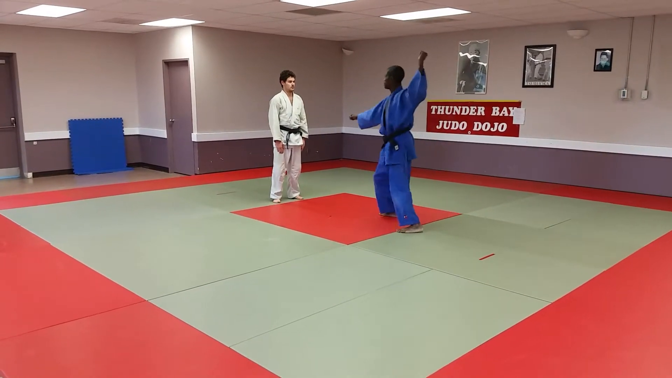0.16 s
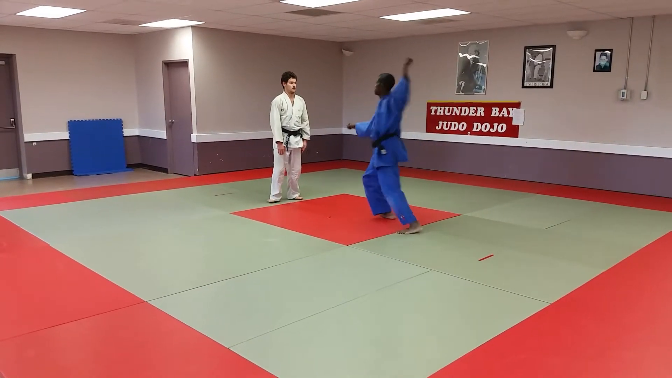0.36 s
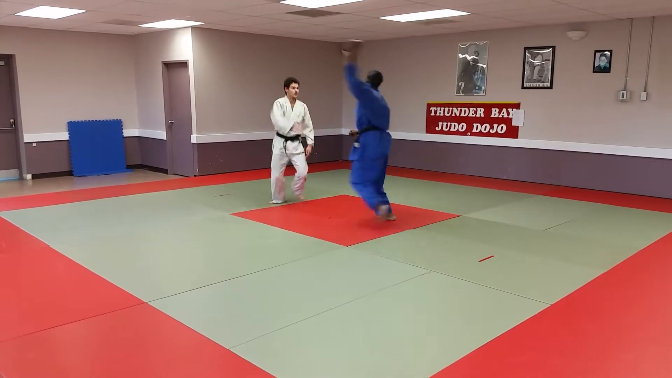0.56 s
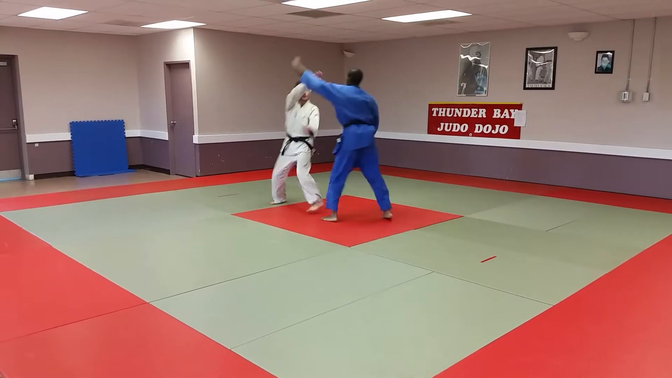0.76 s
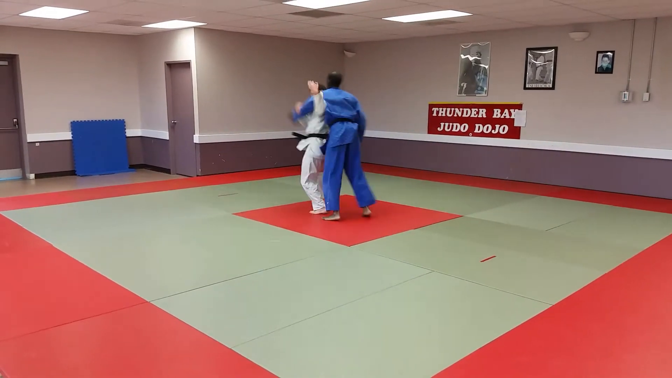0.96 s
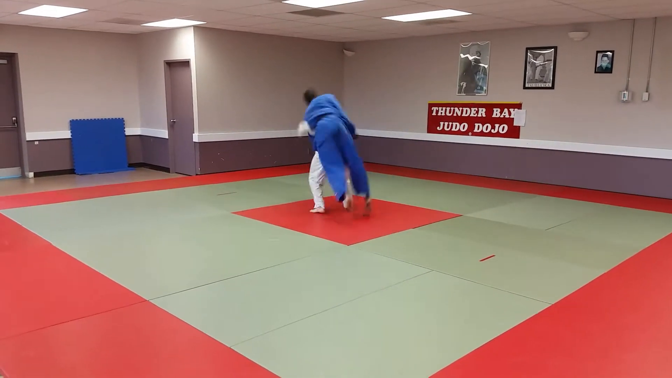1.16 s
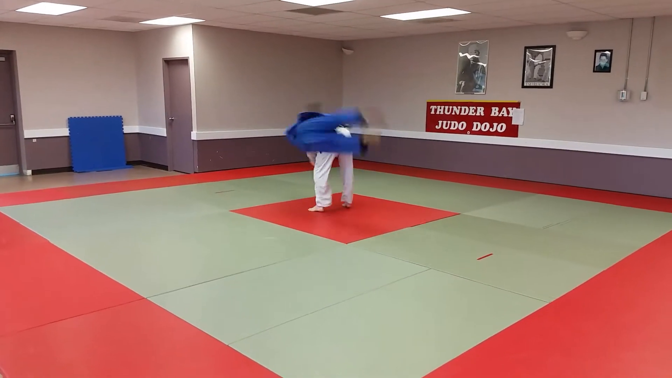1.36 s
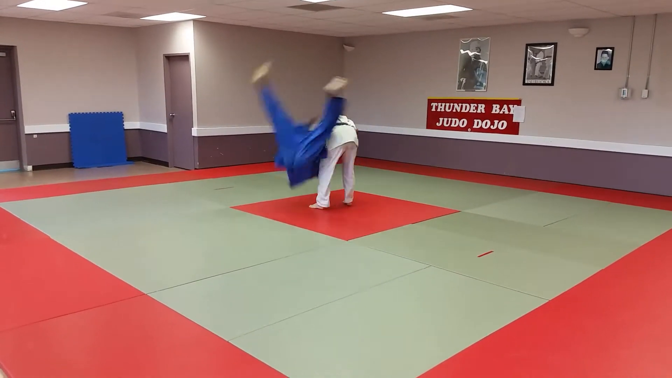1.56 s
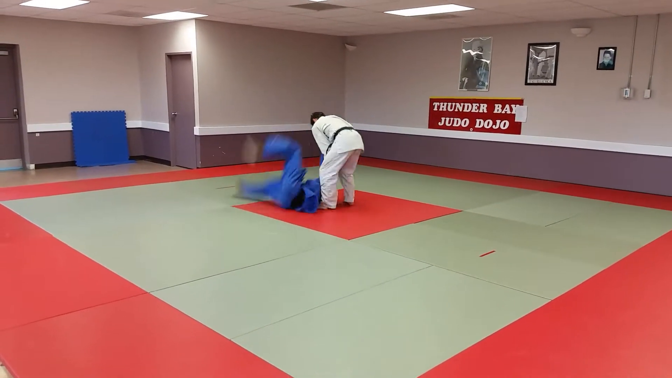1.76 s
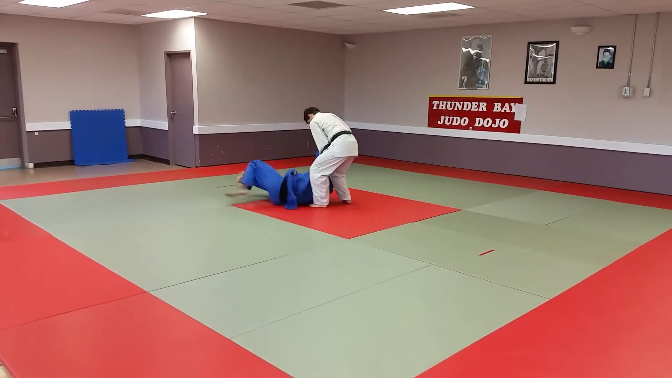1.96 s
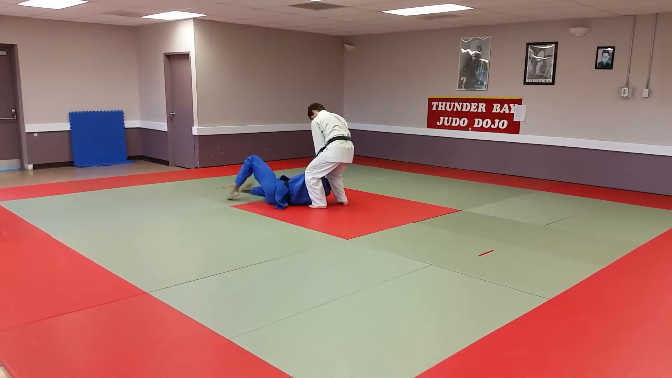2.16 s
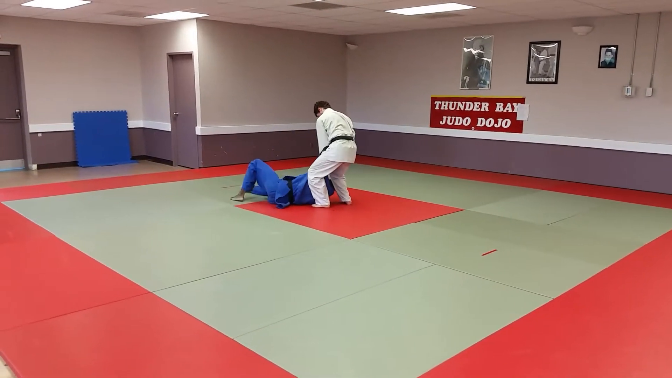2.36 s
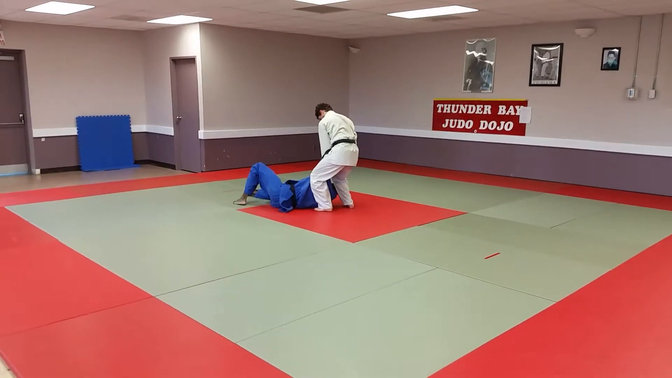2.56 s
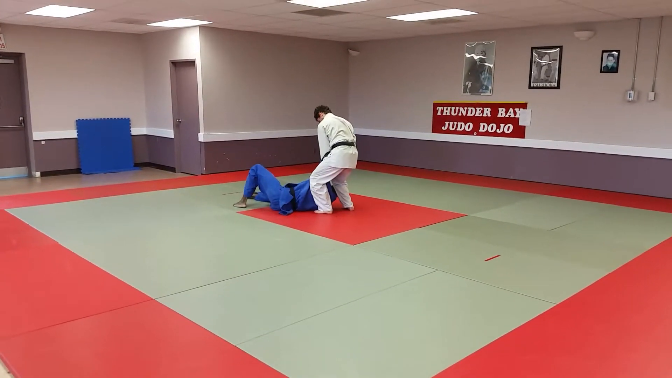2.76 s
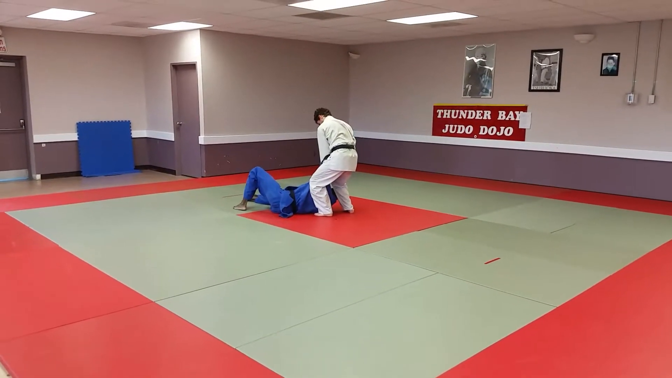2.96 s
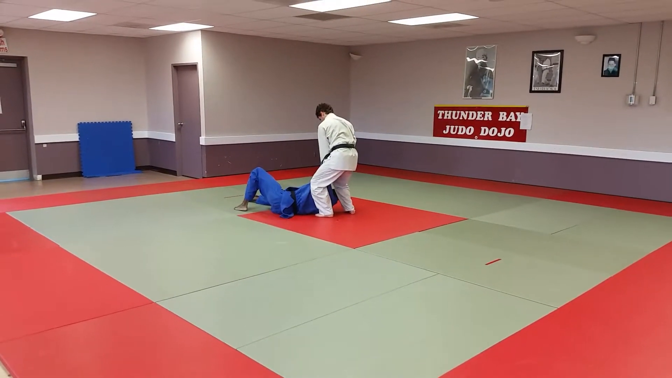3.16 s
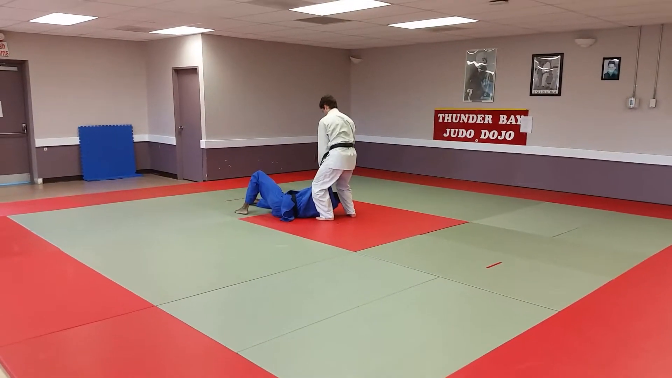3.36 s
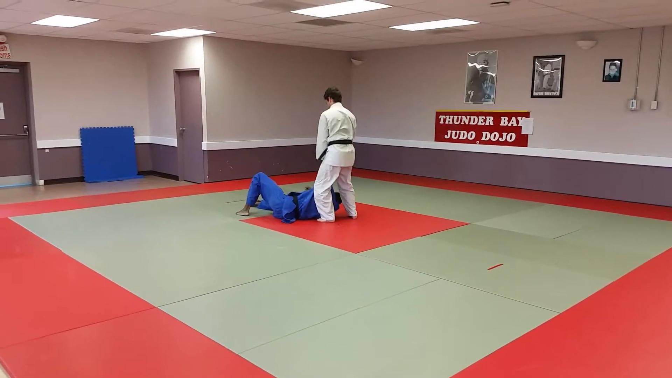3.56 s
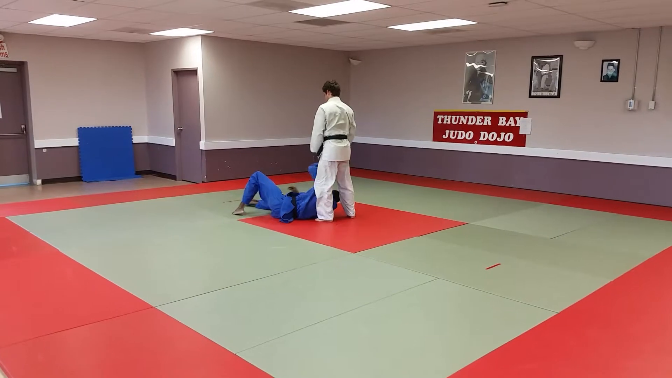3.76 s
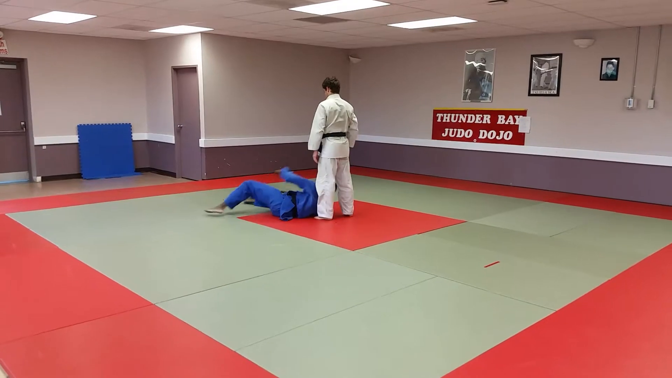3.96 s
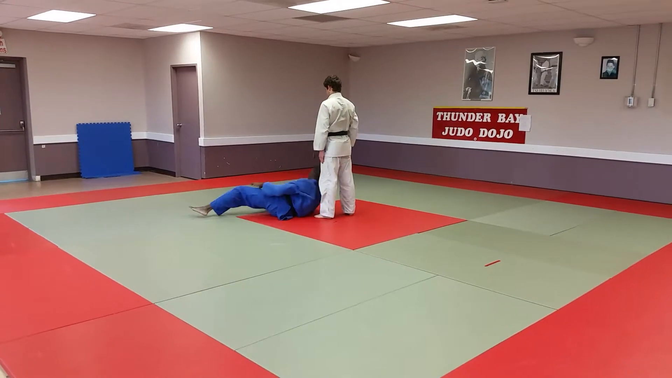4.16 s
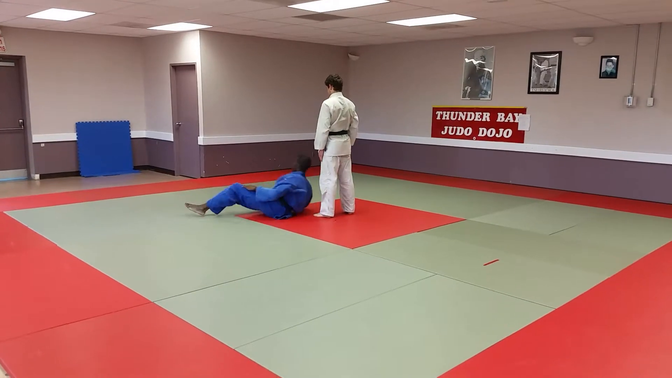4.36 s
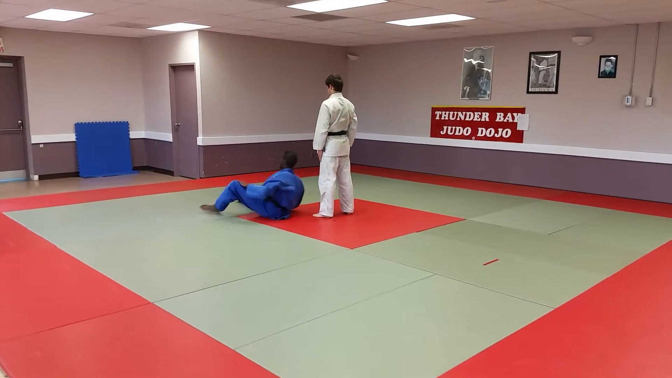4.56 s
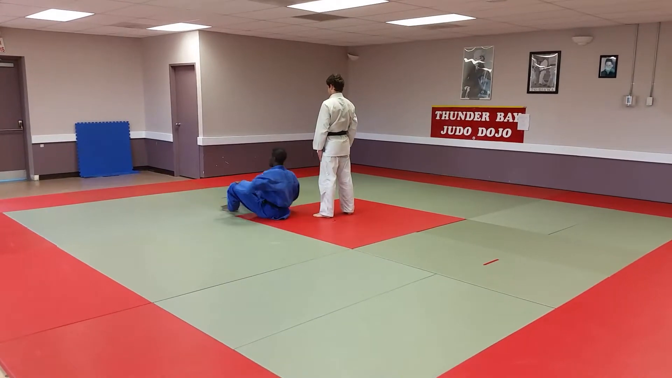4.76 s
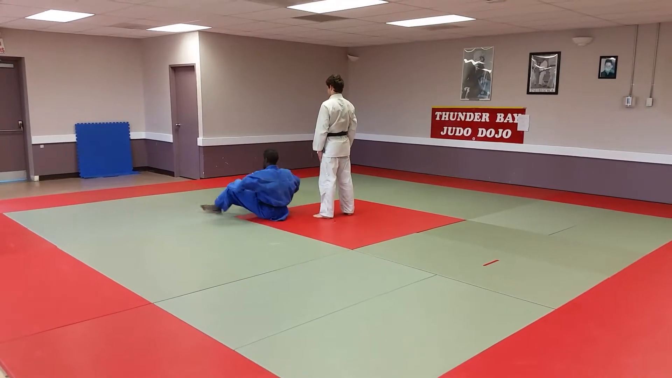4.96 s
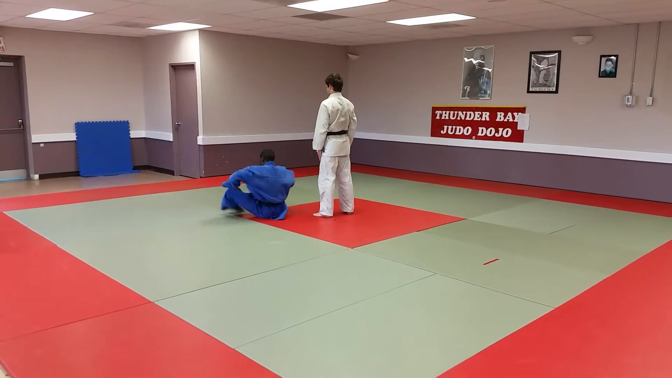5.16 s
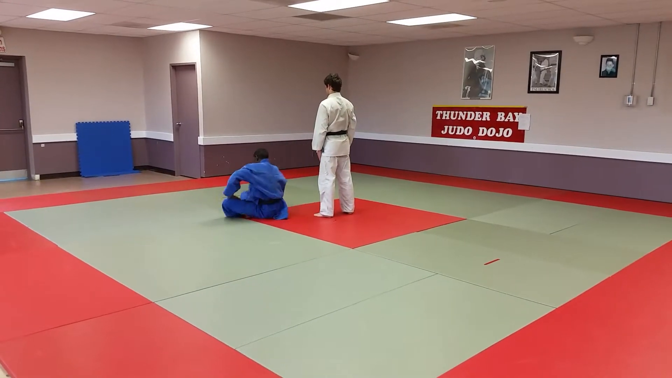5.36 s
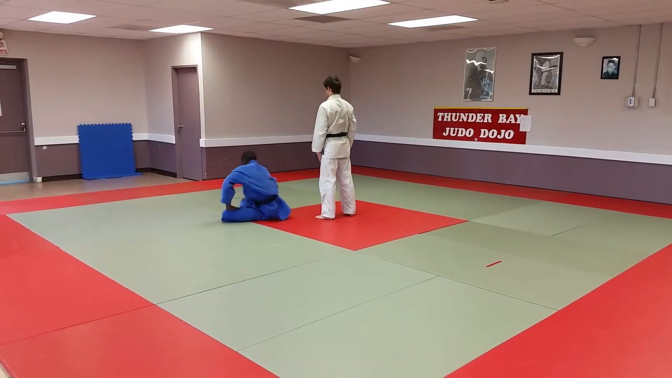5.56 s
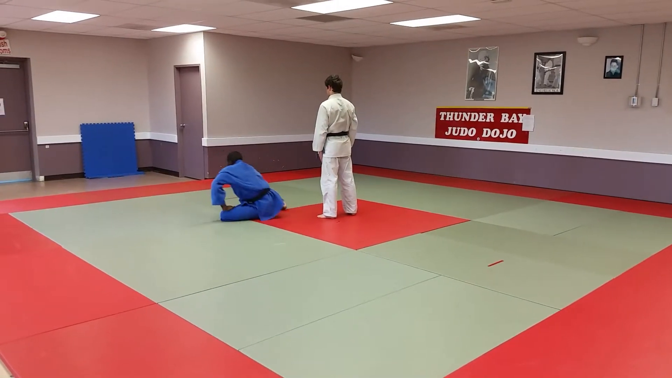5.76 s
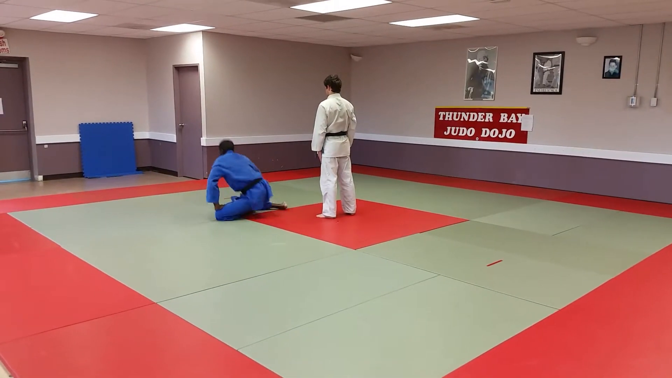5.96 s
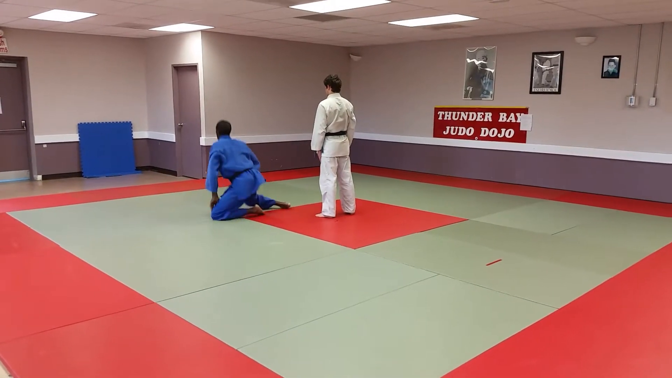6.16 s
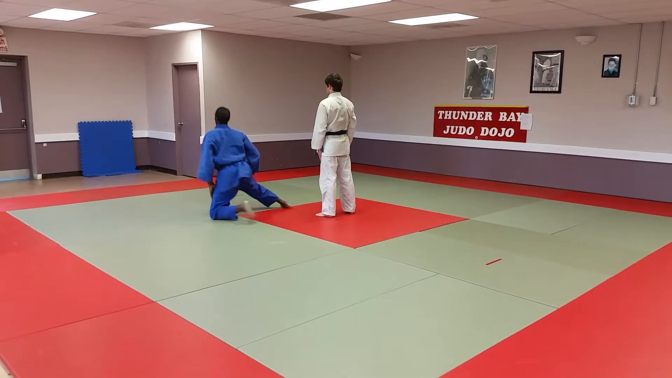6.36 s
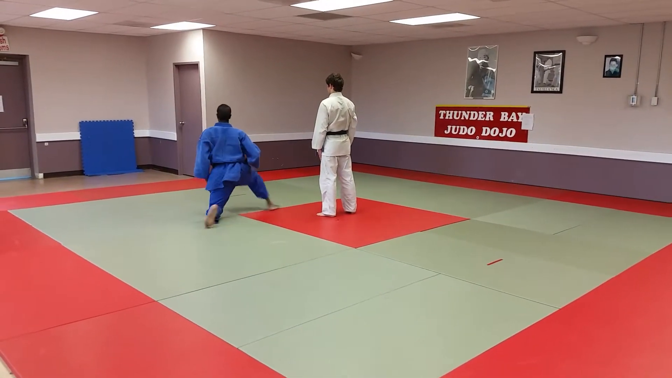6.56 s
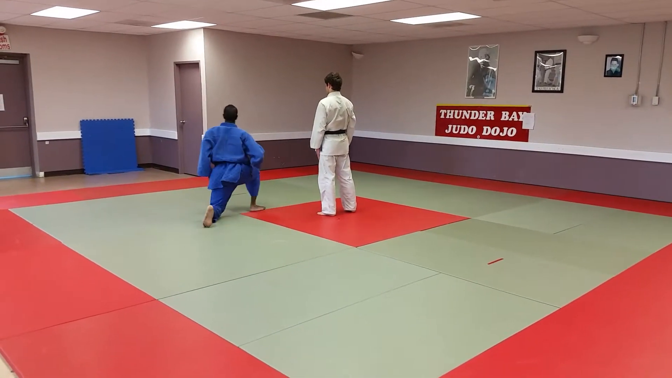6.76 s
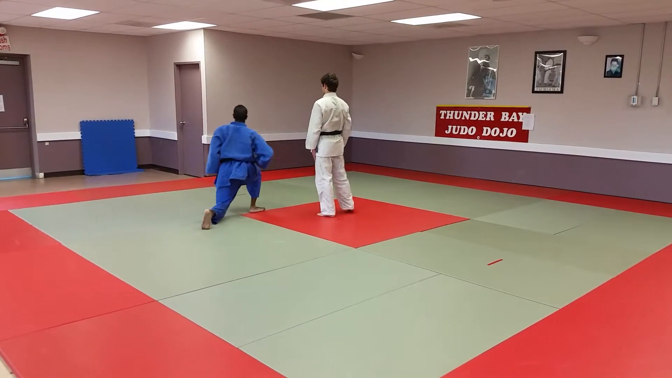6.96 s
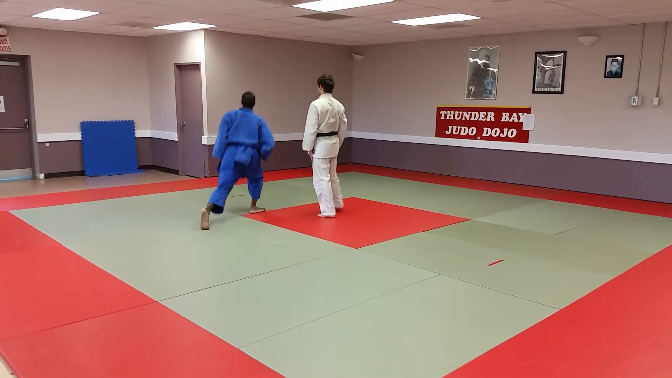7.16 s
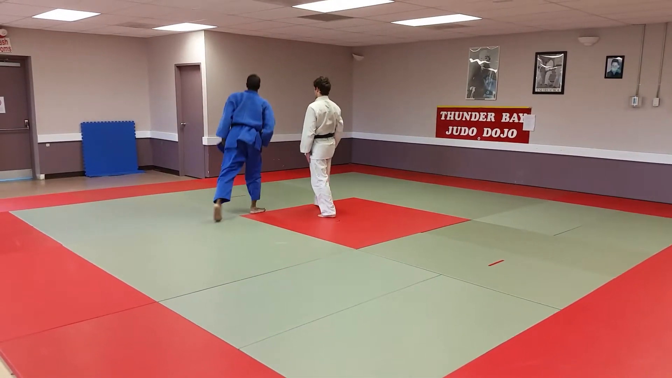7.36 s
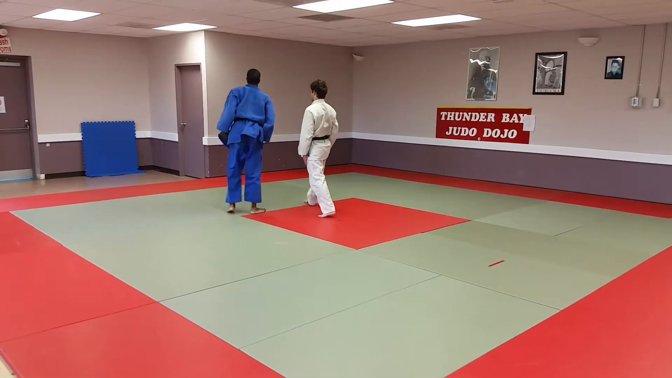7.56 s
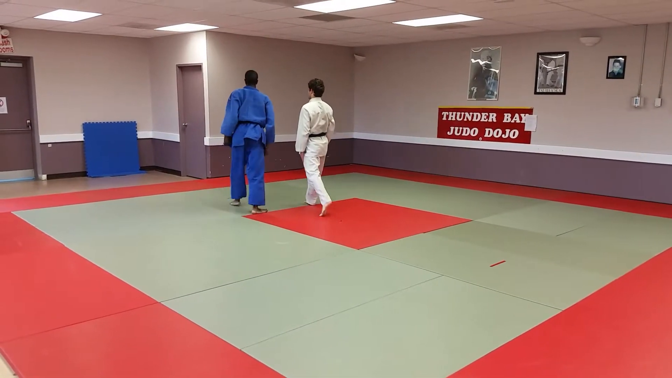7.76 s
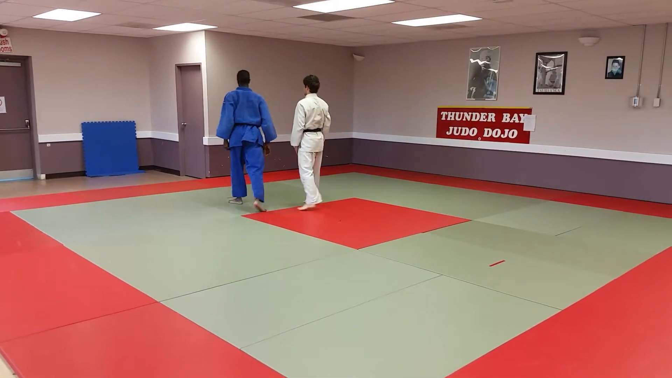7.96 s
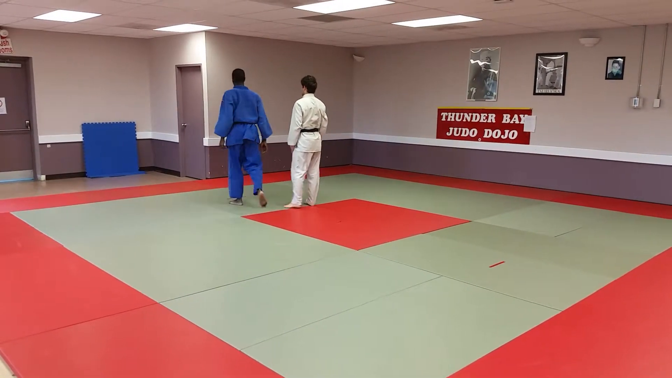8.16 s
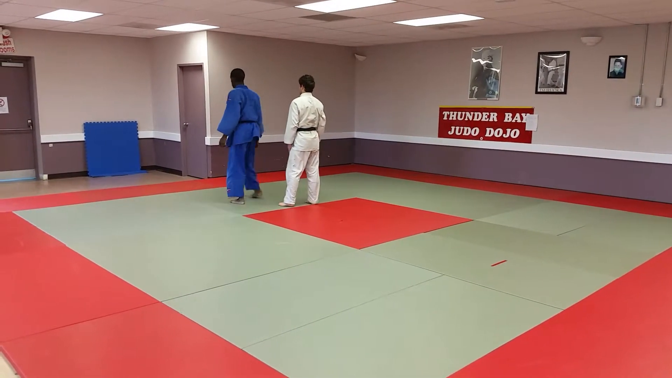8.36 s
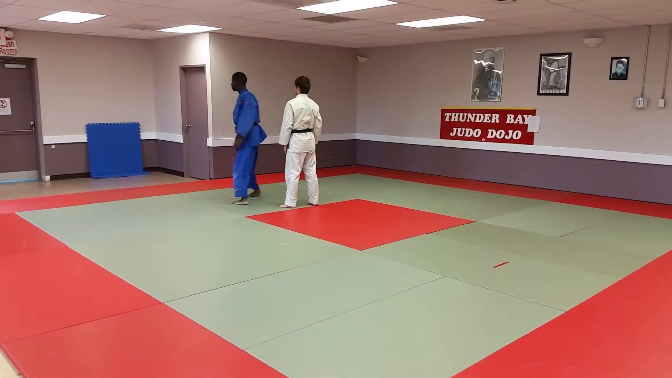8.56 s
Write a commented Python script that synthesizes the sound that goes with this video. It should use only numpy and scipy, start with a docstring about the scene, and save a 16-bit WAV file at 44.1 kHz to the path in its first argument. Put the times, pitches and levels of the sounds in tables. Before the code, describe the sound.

In a humming indoor hall, quick footfalls and jacket tugs lead to a heavy body slam on mats, then faint sliding and a short foot scrape.

```python
"""A judo throw in a low hall: bare feet scuff and stamp on mats, then a body lands with thud and slap.
The thrown partner rolls over, gets up and both shuffle away; ventilation hums throughout.
Impacts are decaying noise bursts with a reverberant tail, and the landing also excites floor modes.
Cloth, knees and soles are friction noise under movement envelopes; a pivoting sole scrapes by stick-slip.
The camera's gain control ducks after the landing, the treble more deeply, and creeps back."""
import sys
import numpy as np
from scipy import signal
from scipy.fft import rfft, irfft, next_fast_len
from scipy.io import wavfile
from scipy.ndimage import uniform_filter1d, minimum_filter1d, map_coordinates

SR = 44100
rng = np.random.default_rng(int(sys.argv[2]) if len(sys.argv) > 2 else 0)


def put_to_file(sound):
    """Save the sound as 16-bit audio at rate SR, in the file named by the first command-line argument."""
    columns = np.atleast_2d(sound).T  # one column per channel
    safe = np.clip(columns, -1, 1)
    whole_steps = np.round(safe * 32767)
    wavfile.write(sys.argv[1], SR, whole_steps.astype(np.int16))


N = 380485
TIME = np.arange(N) / SR  # s

# relative spectrum of the foam's dull thud: freq_hz, density_db (per Hz)
THUD_SPECTRUM = [(20, -28.5), (45, -10), (75, -1), (130, -8.5), (250, -6.5), (340, -13.5), (450, -23),
                 (700, -26), (1500, -66.5)]
# relative spectrum of the knock on the mat cover: freq_hz, density_db (per Hz)
KNOCK_SPECTRUM = [(150, -22.5), (350, 1), (600, 8), (800, 2.5), (1050, 1), (1300, -1.5), (2000, -5),
                  (2700, -23), (5500, -24), (12000, -43.5)]

SAG_DB_PER_S = 5.5  # a stroke loses speed while it lasts
DRAG_T60_S, RASP_T60_S, HISS_T60_S = 0.74, 0.81, 0.54  # each part of a stroke dies away in the hall
STOP_DB, STOP_S = 1, 0.041  # the direct sound goes first when a stroke stops


def amp(db):
    """Logarithmic level: decibels to amplitude gain."""
    return 10 ** (np.asarray(db) / 20)


def unit(x):
    """Normalisation: x scaled to rms 1."""
    return x / np.sqrt(np.mean(x ** 2) + 1e-20)


def along(points, hz):
    """Logarithmic interpolation: (frequency, value) points read on a log frequency axis."""
    point_hz, value = np.transpose(points)
    return np.interp(np.log(hz + 1), np.log(point_hz + 1), value)


def wobble(rate_hz):
    """Slow random modulation: a smooth curve through rate_hz random knots a second."""
    knots = rng.standard_normal(int(N * rate_hz / SR) + 4)
    return map_coordinates(knots, [TIME * rate_hz])


def filtered(x, response):
    """Linear filtering: the spectrum of x times a response of frequency."""
    n = x.shape[-1]
    padded = next_fast_len(n + SR // 8)
    hz = np.fft.rfftfreq(padded, 1 / SR)
    return irfft(rfft(x, padded) * response(hz), padded)[..., :n]


def diffuse(pair, spectrum):
    """Diffuse field: two coloured noises of joint rms 1, alike in the bass, unrelated in the treble."""
    # left-right likeness of the field: freq_hz, coherence (0 to 1)
    likeness = [(60, 0.98), (130, 0.97), (290, 0.89), (640, 0.49), (1400, 0.085), (3000, 0.023), (15000, 0)]

    def mid_side_response(hz):
        angle = np.arccos(np.clip(along(likeness, hz), -1, 1)) / 2
        return amp(along(spectrum, hz)) * [np.cos(angle), np.sin(angle)]

    mid, side = filtered(pair, mid_side_response)
    return unit(np.array([mid + side, mid - side]))


def add(track, start_s, sound):
    """Superposition: mix a sound into the track from start_s."""
    part = track[:, max(round(start_s * SR), 0):][:, :sound.shape[1]]
    part += sound[:, :part.shape[1]]


def ventilation():
    """Broadband flow noise plus rotating machinery: duct rumble, nearly steady lines and faint hiss."""
    # relative spectrum of the duct rumble: freq_hz, density_db (per Hz)
    rumble_spectrum = [(15, -42.5), (26, -21.5), (36, -8), (46, 3.5), (65, -0.5), (85, -4.5), (120, -5.5),
                       (175, -6), (210, -10), (235, -11), (280, -14), (385, -27), (500, -31), (1500, -46),
                       (4000, -83.5)]
    # relative spectrum of the air hiss: freq_hz, density_db (per Hz)
    air_spectrum = [(1000, -9), (1900, 0), (2500, -2), (3400, -5.5), (4100, 3), (5200, -7.5), (6500, -16.5),
                    (7800, -20.5), (9300, -7), (10500, 1.5), (12000, 3), (13700, -5), (15800, -5)]
    # steady fan lines: freq_hz, level_db (rms, before the slow wobble)
    hum_lines = [(44, -46.5), (53.3, -48.5), (65.6, -49.5), (119.8, -44.5), (158.3, -57), (206.4, -48.5)]
    rumble = amp(-40.0) * diffuse(rng.standard_normal((2, N)), rumble_spectrum)
    lines = 0
    for freq_hz, level_db in hum_lines:
        level = amp(level_db + 0.63 * wobble(2)) * np.sqrt(2)  # rms to peak
        phase = 2 * np.pi * freq_hz * TIME + 0.18 * wobble(1)
        lines = lines + level * np.sin(phase)
    hiss = amp(-64.5) * diffuse(rng.standard_normal((2, N)), air_spectrum)
    return rumble + lines + hiss


def friction(spectrum, grain_db, ripple_db):
    """Dry friction: countless tiny slips, uneven in size; wall echoes ripple their colour."""
    slips = rng.standard_normal((2, N)) * amp(grain_db * wobble(1100))
    bins = signal.stft(slips, nperseg=2048)[2]
    ripple = unit(uniform_filter1d(rng.standard_normal(bins.shape), size=7, axis=2))
    rippled = signal.istft(bins * amp(ripple_db * ripple), nperseg=2048)[1][:, :N]
    return diffuse(rippled, spectrum)


def stroke(start_s, rise_s, hold_s, t60_s):
    """Speed-driven envelope: a movement gathers speed, slowly sags, stops and dies away."""
    t = TIME - start_s
    speeding = np.sin(np.pi / 2 * np.clip(t / rise_s, 0, 1)) ** 2
    stopped_s = np.maximum(t - rise_s - hold_s, 0)
    sag_db = SAG_DB_PER_S * np.clip(t - rise_s, 0, hold_s)
    stop_db = STOP_DB * np.minimum(stopped_s / STOP_S, 1)
    return speeding * amp(-(sag_db + stop_db + 60 * stopped_s / t60_s))


def strokes(rows, levels_db, t60_s):
    """Incoherent summation: overlapping movements add up in power."""
    power = 0
    for (start_s, rise_s, hold_s, *_), level_db in zip(rows, levels_db):
        power = power + (amp(level_db) * stroke(start_s, rise_s, hold_s, t60_s)) ** 2
    return np.sqrt(power)


def sliding(rows, drag_spectrum, drag_trim_db, rasp_trim_db, hiss_trim_db, jerk_db):
    """Sliding contact: low drag in small jerks, rasp of the grain and treble hiss share one pressure."""
    # relative spectrum of the rasp: freq_hz, density_db (per Hz)
    rasp_spectrum = [(1500, -20), (2400, -3), (3100, -2), (3700, -1.5), (4600, 1.5), (5700, 2), (7200, -1),
                     (9000, -4), (14000, -40.5)]
    # relative spectrum of the hiss: freq_hz, density_db (per Hz)
    hiss_spectrum = [(5000, -54), (7400, -20.5), (8400, -9.5), (9300, -1), (10200, 2), (12000, 0),
                     (13300, -7), (15800, -7.5)]
    *_, drag_db, rasp_db, hiss_db = np.transpose(rows)
    pressure = amp(0.66 * wobble(60))
    jerks = amp(jerk_db * wobble(42))
    drag = strokes(rows, drag_db + drag_trim_db, DRAG_T60_S) * jerks
    drag = drag * friction(drag_spectrum, grain_db=1.0, ripple_db=3.5)
    rasp = strokes(rows, rasp_db + rasp_trim_db, RASP_T60_S)
    rasp = rasp * friction(rasp_spectrum, grain_db=1.0, ripple_db=3.5)
    hiss = strokes(rows, hiss_db + hiss_trim_db, HISS_T60_S)
    hiss = hiss * friction(hiss_spectrum, grain_db=1.15, ripple_db=2.5)
    return pressure * (drag + rasp + hiss)


def shuffling():
    """Friction noise: a stamp's tail and pulled jackets, then the thrown body sliding, then bare soles."""
    # Movement columns, levels before trims: start_s, rise_s, hold_s, drag_db, rasp_db, hiss_db
    # a stamp's tail dies away at the start; then jackets swing, are gripped, pulled and settle:
    # movement columns
    tugs = [(0.0, 0.0019, 0.014, -46, -50.5, -42.5), (0.265, .015, .02, -68, -71, -57.5),
            (0.315, 0.071, .02, -64, -65, -48.5), (0.52, 0.036, .19, -61, -75.5, -56.5),
            (0.772, 0.037, .025, -49.5, -47.5, -31), (0.89, 0.075, 0.068, -49, -49, -38.5),
            (1.112, 0.039, .055, -45.5, -50, -36.5), (1.365, 0.024, 0.027, -54, -68, -53.5),
            (1.47, .04, 0.33, -56, -77, -63), (1.62, .03, .01, -65, -77.5, -56.5),
            (1.73, 0.095, 0.037, -56.5, -71, -54.5), (2.28, 0.021, 0.087, -63.5, -67, -53)]
    # the thrown body rolls, slides and kneels up: movement columns
    slides = [(3.65, 0.16, .05, -68.5, -79, -70), (3.86, .075, .035, -68, -69.5, -54.5),
              (4.03, 0.036, .03, -71, -79, -62.5), (4.53, .1, .06, -68.5, -62.5, -49.5),
              (4.76, .1, 0.033, -72, -76, -56), (4.85, 0.15, .08, -59, -52, -40),
              (5.08, .09, 0.11, -60.5, -47.5, -38), (5.26, 0.03, .09, -60.5, -53.5, -43),
              (5.85, .2, 0.045, -82, -87, -64.5), (6.04, 0.2, .12, -73, -70, -55.5),
              (6.32, .08, .06, -56, -53.5, -45.5), (6.49, .08, .04, -62.5, -56, -46),
              (6.57, 0.12, .06, -54.5, -42, -32.5), (6.95, 0.053, .17, -74.5, -82, -65)]
    # bare soles drag over the vinyl: movement columns
    shuffles = [(7.18, 0.059, 0.34, -77, -62.5, -49.5), (7.33, 0.23, .09, -67, -55.5, -43),
                (7.56, 0.049, 0.034, -54.5, -43, -34), (7.63, .08, .1, -51.5, -44, -39.5),
                (7.8, 0.048, .11, -55, -48.5, -39.5), (8.045, .012, .06, -69, -53, -40.5),
                (8.16, 0.072, .06, -66, -57.5, -50), (8.297, 0.031, 0.011, -53, -39, -20.5),
                (8.345, 0.046, 0.066, -69, -36, -26), (8.44, 0.033, 0.033, -55, -37, -24.5)]
    # relative drag spectrum of heavy cotton: freq_hz, density_db (per Hz)
    cloth_spectrum = [(150, -30), (330, 1), (600, 2), (1000, -7), (1900, -7), (2700, -15), (4000, -37.5)]
    # relative drag spectrum of the sliding body: freq_hz, density_db (per Hz)
    body_spectrum = [(500, -0.5), (1100, -7), (1500, -0.5), (1950, 0), (2500, -7.5), (3600, -28),
                     (6000, -60)]
    # relative drag spectrum of a bare sole: freq_hz, density_db (per Hz)
    sole_spectrum = [(500, -13), (900, -19), (1200, -17), (1500, -7), (1900, -3.5), (2400, -7.5),
                     (2900, -8), (5000, -59)]
    tail_and_jackets = sliding(tugs, cloth_spectrum, drag_trim_db=0.0, rasp_trim_db=0.5,
                               hiss_trim_db=1.5, jerk_db=1.7)
    body = sliding(slides, body_spectrum, drag_trim_db=1.5, rasp_trim_db=-0.6, hiss_trim_db=3.5,
                   jerk_db=1.0)
    soles = sliding(shuffles, sole_spectrum, drag_trim_db=2.0, rasp_trim_db=0.9, hiss_trim_db=3.0,
                    jerk_db=-1.3)
    return tail_and_jackets + body + soles


def blow(spectrum, attack_s, t60_s, room_db, bloom_s):
    """Impact and reverberation: a short burst, then a hall tail decaying at a rate set by frequency."""
    # the hall's reverberation time: freq_hz, t60_s
    hall_decay = [(60, 0.55), (250, 0.75), (600, 0.45), (2000, 0.99), (4500, 1.43), (10000, 0.49),
                  (15000, 0.81)]
    t = np.arange(SR) / SR
    hz, frame_s, bins = signal.stft(diffuse(rng.standard_normal((2, SR)), spectrum), SR, nperseg=512)
    decay = amp(-60 * frame_s / along(hall_decay, hz)[:, None])
    tail = signal.istft(bins * decay, SR, nperseg=512)[1][:, :SR]
    burst = diffuse(rng.standard_normal((2, SR)), spectrum) * amp(-60 * t / t60_s)
    energy = np.sum(amp(-120 * t / t60_s))
    burst *= np.sqrt(2 * energy / np.sum(burst ** 2))  # same energy whatever the noise drawn
    tail = unit(tail * (1 - np.exp(-t / bloom_s)))
    tail = tail * np.sqrt(energy / SR)  # longer blows feed the hall more
    return burst * (1 - np.exp(-t / attack_s)) + amp(room_db) * tail


def steps():
    """Impact on a soft layer: stamping feet and knees knock the cover and thud in the foam."""
    # feet and knees stamp on the mat, levels before trims: start_s, knock_db, thud_db
    stamps = [(0.011, -41.5, -24), (0.602, -37, -41), (0.901, -28.5, -44.5), (1.051, -25, -30),
              (1.071, -43, -23), (1.138, -46.5, -31), (1.182, -35, -26.5), (1.224, -41.5, -26.5),
              (1.378, -34, -34.5), (1.5863, -31.5, -42), (1.612, -39.5, -30), (6.389, -49, -35.5)]
    out = np.zeros((2, N))
    for start_s, knock_db, thud_db in stamps:
        knock = blow(KNOCK_SPECTRUM, attack_s=0.0022, t60_s=0.038, room_db=-1.5, bloom_s=0.0054)
        thud = blow(THUD_SPECTRUM, attack_s=0.0017, t60_s=0.1, room_db=-2, bloom_s=0.024)
        add(out, start_s, amp(knock_db - 4.5) * knock)
        add(out, start_s, amp(thud_db - 1.0) * thud)
    return out


def smacks_and_ticks():
    """Flat impact: skin cracks for milliseconds, cloth flaps for longer, small ticks; all fill the hall."""
    # skin and cloth smack on the vinyl, with a few small ticks, levels before the trim:
    # start_s, level_db, t60_s
    slaps_and_ticks = [(0.6015, -20.5, 0.0083), (0.7805, -24, 0.03), (1.179, -31, .012),
                       (1.866, -18.5, 0.14), (1.8791, -3, 0.018), (1.8865, -3.5, 0.016), (1.897, -1, 0.015),
                       (1.92, -10.5, 0.1), (1.985, -16.5, 0.59), (2.101, -17.5, 0.2),
                       (3.426, -43.5, 0.0089), (7.15, -30, 0.018), (8.0533, -29, 0.023)]
    # relative spectrum of a smack or tick: freq_hz, density_db (per Hz)
    slap_spectrum = [(500, -17.5), (1800, -5), (3200, -12), (5500, -9.5), (7400, -15.5), (8500, -9.5),
                     (9600, 1.5), (11000, -1.5), (13000, -10.5), (15800, -16)]
    out = np.zeros((2, N))
    for start_s, level_db, t60_s in slaps_and_ticks:
        contact = blow(slap_spectrum, attack_s=0.00021, t60_s=t60_s, room_db=-1, bloom_s=0.01)
        add(out, start_s, amp(level_db - 11.5) * contact)
    return out


def ring(attack_s):
    """Modal vibration: decaying sines, struck at a new spot and so at new strengths each time."""
    # floor under the mats and hall modes, before random strength: freq_hz, level_db (relative), t60_s
    floor_modes = [(82.25, 4.5, 1), (181.7, -5, 1), (211, -9, 0.76), (259, -6, .6), (322, -10.5, 0.96),
                   (454, -12, 0.41), (640, -21, 0.46), (717, -20.5, 0.6), (1036, -22.5, 0.5),
                   (1065, -19, 0.47)]
    t = np.arange(SR) / SR
    strengths = rng.standard_normal(len(floor_modes))
    modes = 0
    for (freq_hz, level_db, t60_s), strength in zip(floor_modes, strengths):
        envelope = amp(level_db + 2 * strength - 60 * t / t60_s)
        modes = modes + envelope * np.sin(2 * np.pi * freq_hz * t)
    return (modes * (1 - np.exp(-t / attack_s)))[None]  # one row, shared by both channels


def landing():
    """Successive impacts of a body's parts: the cover knocks, the foam thuds and the floor booms."""
    # heel, hip, back, arm and bouncing legs hit, levels before trims: start_s, knock_db, thud_db
    hits = [(1.84, -23, -22.5), (1.8531, -11.5, -18.5), (1.867, -11, -9.5), (1.902, -21.5, -10),
            (1.924, -12.5, -13), (1.946, -20.5, -8.5), (1.975, -14.5, -17.5), (2.002, -17.5, -13),
            (2.038, -24, -16.5), (2.098, -37, -20), (2.131, -41, -20), (2.263, -46, -34)]
    out = np.zeros((2, N))
    for start_s, knock_db, thud_db in hits:
        knock = blow(KNOCK_SPECTRUM, attack_s=0.0047, t60_s=0.1, room_db=0.0, bloom_s=0.0069)
        thud = blow(THUD_SPECTRUM, attack_s=0.0027, t60_s=0.14, room_db=-4.0, bloom_s=0.019)
        add(out, start_s, amp(knock_db - 7.0) * knock)
        add(out, start_s, amp(thud_db + 2.5) * thud)
        add(out, start_s, amp(thud_db - 20.5) * ring(attack_s=0.0044))
    return out


def pivot():
    """Stick-slip: the uneven slips of a turning foot make a hoarse, falling scrape."""
    # a pivoting sole sticks and slips, slower as it stops: time_s, slip_rate_hz, level_db
    slip_track = [(8.31, 3200, -75), (8.37, 3100, -44.5), (8.44, 3100, -44.5), (8.48, 2555, -64.5),
                  (8.52, 2390, -57), (8.591, 2220, -56), (8.63, 2224, -69)]
    time_s, slip_rate_hz, level_db = np.transpose(slip_track)
    phase = 2 * np.pi * np.cumsum(np.interp(TIME, time_s, slip_rate_hz)) / SR
    # random modulation in quadrature widens the tone into a narrow noise band
    hoarse = np.array([wobble(410) * np.sin(phase) + wobble(380) * np.cos(phase) for _ in range(2)])
    return np.interp(TIME, time_s, amp(level_db), left=0) * unit(hoarse)


def scene():
    """Superposition of everything heard in the hall."""
    return ventilation() + shuffling() + steps() + smacks_and_ticks() + landing() + pivot()


def ducking(x, threshold_db, slope, hold_s, release_db_per_s, attack_s):
    """Level-controlled gain: the cut in dB follows loud sound, holds, then recovers steadily."""
    power = np.abs(uniform_filter1d(np.mean(x ** 2, axis=0), size=2048))
    wanted_db = slope * np.maximum(10 * np.log10(power + 1e-12) - threshold_db, 0)
    half = int(hold_s * SR / 2)
    # the largest cut wanted during the last hold_s
    held_db = -minimum_filter1d(-wanted_db, 2 * half + 1, origin=half, mode="constant")
    ramp_db = release_db_per_s * TIME
    released_db = np.maximum.accumulate(held_db + ramp_db) - ramp_db
    pole = np.exp(-1 / (attack_s * SR))

    def glide(db):
        return signal.lfilter([1 - pole], [1, -pole], db)

    return glide(glide(released_db))  # the gain eases down, so the blow itself passes whole


def record(dry):
    """Two-band compression after port colour: the treble is cut by its own rule, then band-limited."""
    # treble difference of the two microphone ports: freq_hz, left_minus_right_db
    port_difference = [(200, -0.84), (2400, -0.5), (3400, -1), (4200, -3), (5600, -9), (6800, -6.5),
                       (8500, 9), (10000, 5.5), (13000, 2.5), (15500, -4.5)]
    sides = np.array([[.5], [-.5]])  # left and right each take half the difference
    x = filtered(dry, lambda hz: amp(along(port_difference, hz) * sides))
    bass = filtered(x, lambda hz: 1 / (1 + (hz / 1100) ** 4))
    treble = x - bass
    # both cuts follow the full band
    bass_cut_db = ducking(x, threshold_db=-18, slope=1.23, hold_s=0.58,
                          release_db_per_s=19.5, attack_s=0.16)
    treble_cut_db = ducking(x, threshold_db=-20.0, slope=2.83, hold_s=0.41,
                            release_db_per_s=36.0, attack_s=0.31)
    levelled = bass * amp(-bass_cut_db) + treble * amp(-treble_cut_db)
    return filtered(levelled, lambda hz: hz < 15850)  # band limit in Hz


dry = scene()
out = record(dry)
put_to_file(out)
```